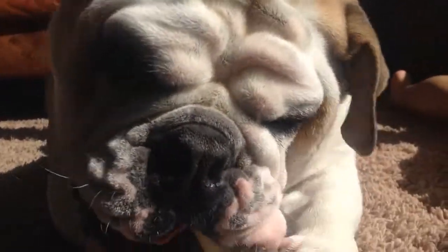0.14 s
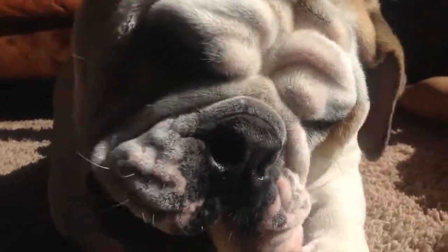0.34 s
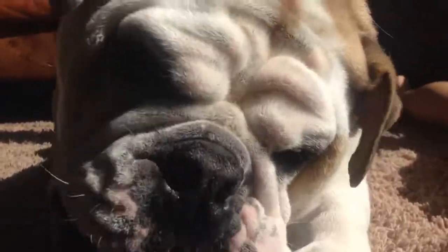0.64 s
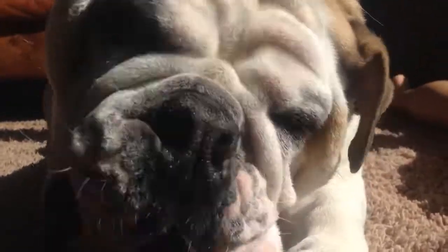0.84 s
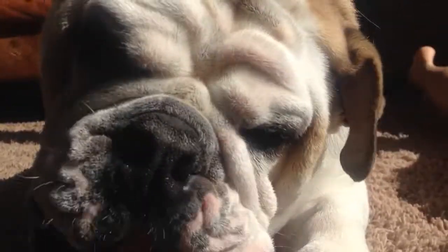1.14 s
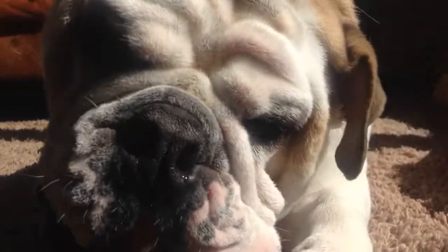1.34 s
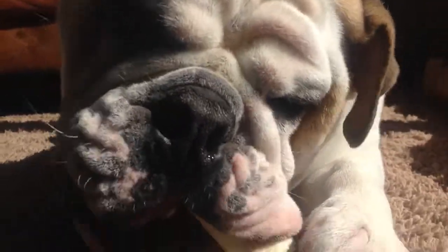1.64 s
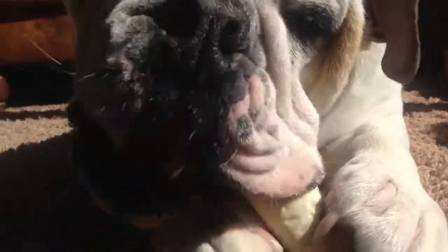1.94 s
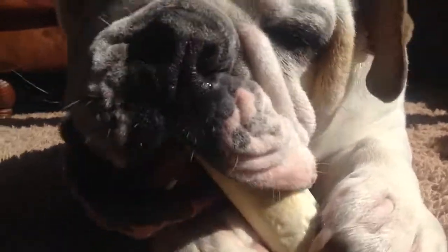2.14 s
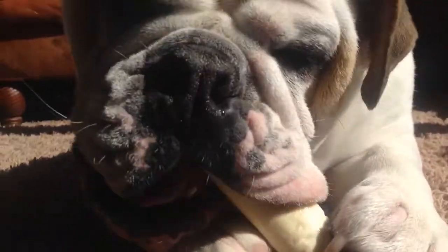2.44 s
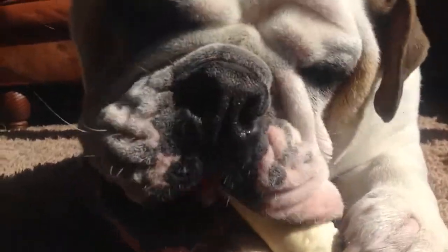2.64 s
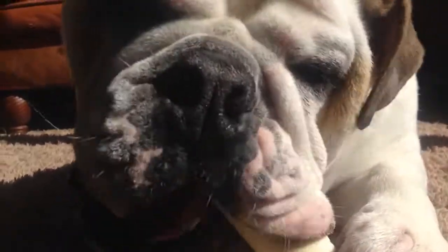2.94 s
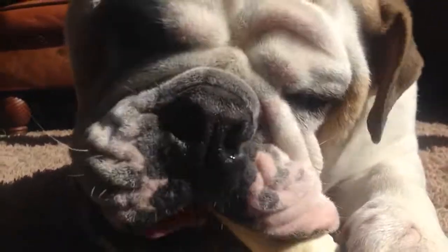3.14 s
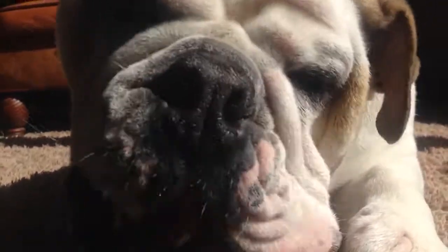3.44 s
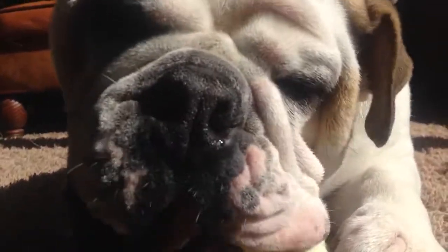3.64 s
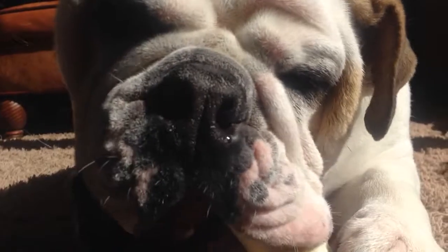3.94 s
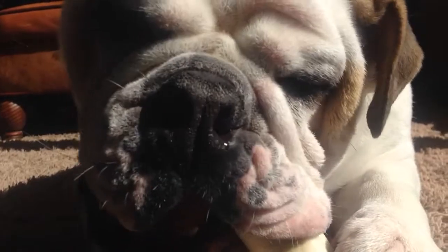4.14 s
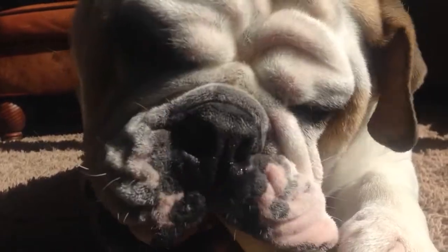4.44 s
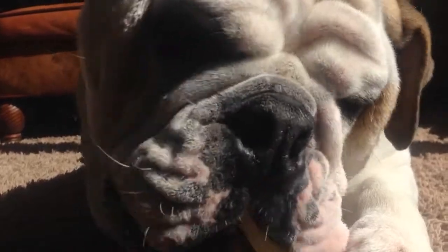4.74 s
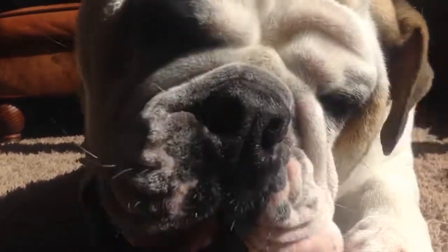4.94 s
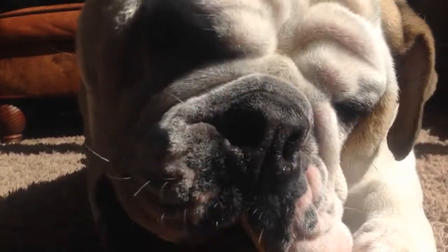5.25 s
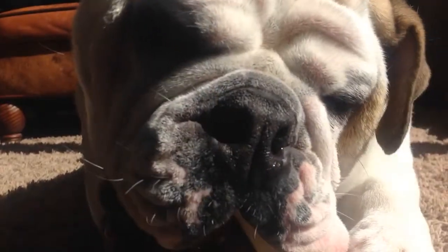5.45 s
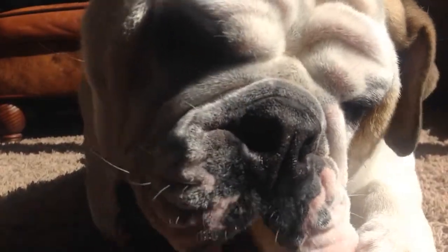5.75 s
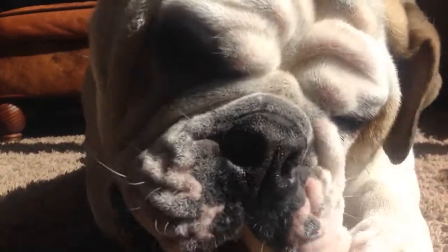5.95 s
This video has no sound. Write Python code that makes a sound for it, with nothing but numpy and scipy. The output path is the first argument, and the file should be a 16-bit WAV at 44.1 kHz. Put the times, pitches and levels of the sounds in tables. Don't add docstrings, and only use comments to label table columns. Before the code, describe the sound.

Very close, a big dog chews a hard bone on carpet. Loud, dry, hollow clacks come irregularly as teeth slip off, with smaller gritty crunches, creaks and splintering ticks around them. Between bites the nose gives short airy hisses with a thin whistle. Soft low bumps and rumble come from the hand-held microphone; the furnished room is quiet and nearly echoless.

```python
import sys
import numpy as np
from scipy import signal
from scipy.fft import rfft, irfft, next_fast_len
from scipy.io import wavfile
from scipy.ndimage import map_coordinates

SR = 44100
rng = np.random.default_rng(int(sys.argv[2]) if len(sys.argv) > 2 else 0)


def gain_from_db(level_db):
    decades = np.asarray(level_db, float) / 20
    return 10 ** decades


def master_out(mix):
    frames = np.transpose(np.atleast_2d(mix))
    ceiling = np.clip(frames, -1, 1)
    pcm = np.round(ceiling * 32767).astype(np.int16)
    wavfile.write(sys.argv[1], SR, pcm)


N = 268569

# (frequency [Hz], density [dB per Hz])
FLOOR_SPECTRUM = [(12, -68), (20, -21), (59, 5), (87, -7), (180, -10.5), (231, -12), (380, -22.5),
                  (488, -25.5), (701, -18.5), (1090, -27.5), (1190, -31.5), (2250, -33), (3140, -21.5),
                  (5320, -26), (15300, -28.5)]
# (frequency [Hz], density [dB per Hz])
RUMBLE_SPECTRUM = [(12, -48), (20, -19.5), (48, -6.5), (70, -2), (140, -15), (179, -13.5), (255, -25),
                   (400, -30), (520, -55), (880, -120)]
# (time [s], level [dB])
HAND_UNREST = [(0, -49.5), (.33, -69), (.5, -58), (.92, -62.5), (1.41, -62), (1.85, -57), (2.22, -57),
               (2.71, -63.5), (3.1, -61), (3.92, -76.5), (4.55, -63.5), (5.12, -66.5), (5.55, -62.5),
               (6.09, -67.5)]
# (time [s], peak [dB], frequency [Hz])
HAND_BUMPS = [(.002, -40, 89), (.034, -37, 65.4), (.059, -25.5, 83), (.372, -50, 91), (.448, -48, 94),
              (.66, -47.5, 86), (.703, -32, 84.6), (1.475, -49.5, 91), (1.598, -40, 94), (1.637, -34, 78),
              (1.67, -32, 99), (1.691, -41, 71), (1.779, -28.5, 96), (1.799, -29.5, 94), (1.842, -40, 118),
              (1.887, -43, 82), (1.915, -35.5, 68), (1.983, -43, 85), (2.066, -45.5, 81), (2.148, -42, 140),
              (2.167, -37, 76.5), (2.209, -42, 71.4), (2.286, -49, 89), (2.336, -47, 81.5),
              (2.763, -50, 87.9), (4.648, -47.5, 104), (4.671, -43.5, 101), (5.628, -42, 100),
              (5.863, -34, 105.6), (1.72, -47, 60), (1.862, -39, 95), (2.035, -47, 90), (2.13, -44, 75),
              (4.6, -49, 110), (5.15, -50, 90), (5.55, -48, 70), (5.645, -48, 100), (5.715, -50, 90),
              (2.585, -48, 100), (3.16, -48, 90)]
# (time [s], peak [dB])
JAW_THUMPS = [(1.193, -38.5), (2, -38), (2.44, -41), (2.494, -48), (2.544, -32.5), (2.61, -38.5),
              (2.898, -39), (2.954, -39), (2.975, -50), (3.098, -37), (4.005, -47.5), (4.395, -37.5),
              (4.965, -47), (.967, -52), (1.558, -50), (3.46, -50), (5.785, -48)]
# (frequency [Hz], t60 [s])
ROOM_DECAY = [(300, .08), (1200, .12), (4000, 0.1)]

# (frequency [Hz], density [dB per Hz])
NOSE_SPECTRUM = [(1500, -40), (2100, -14), (2450, -5), (2900, -4), (3400, -1), (4400, -8), (4850, -7),
                 (5600, -16), (7200, -19), (9500, -41)]
# (frequency [Hz], density [dB per Hz])
RASP_SPECTRUM = [(250, -26.5), (450, 3.5), (700, -9.5), (1100, -2.5), (1600, -4), (2200, -6), (3000, -41)]
# (frequency [Hz], width [Hz])
NOSTRIL_BANDS = [
    (3400, 330),
    (3800, 420),
]
# (start [s], hold [s], hiss [dB], whistle over the hiss [dB], nostril narrowing [0-1])
NOSE_PUFFS = [(.01, 0.09, -73, 2, .02), (0.331, .05, -65.5, -4, 0), (0.557, .28, -59, 1, 0.95),
              (1.94, 0.18, -69.5, -10, .07), (2.24, 0.066, -70.5, -14, .02),
              (2.726, 0.096, -60.5, 3.5, 0.3), (2.907, 0.018, -68, -2, .4), (3.4, .05, -74, -3.5, .1),
              (4.22, 0.093, -72.5, -10, .05), (4.804, 0.083, -59.5, 2, .12), (4.97, .05, -66, -2, .65)]
# (time [s], level [dB])
PANTING = [(0, -70), (.4, -78), (1.2, -74.5), (2.1, -77), (3, -74), (3.7, -77.5), (4.4, -76), (5.4, -77.5),
           (5.8, -78), (6.09, -79.5)]

# (frequency [Hz], level [dB], t60 [s])
BONE_MODES = [(408, 2.5, 0.016), (500, 3.5, 0.037), (720, 0, 0.055), (1020, -1, 0.025), (1250, -3.5, 0.028),
              (1580, -16, 0.0365)]
# (frequency [Hz], density [dB per Hz])
ENAMEL_SPECTRUM = [(1200, -33.5), (2000, -0.5), (2500, -0.5), (3300, -0.5), (4300, -10.5), (5200, -20.5),
                   (7500, -31), (10000, -55)]
# (frequency [Hz], density [dB per Hz])
CREAK_SPECTRUM = [(300, -44.5), (600, -9), (1000, -1.5), (1500, -3.5), (1900, -8), (2600, -44)]
# (time [s], peak [dB], mouth ring [Hz], ring t60 [s], cheek ring [Hz])
SLIPS = [(.5416, -4.5, 1506, 0.015, 1197), (.9615, -12, 1640, 0.014, 1220),
         (1.5044, -22.5, 1584, 0.014, 1000), (1.9626, -7.5, 1508, 0.015, 1244),
         (2.544, -15, 1470, 0.016, 1040), (2.884, -7, 1217, 0.012, 1650), (2.961, -16.5, 1020, 0.018, 1440),
         (3.093, -14, 1547, .023, 680), (3.44, -11.5, 1215, 0.016, 1610), (4.392, -25, 1020, .026, 1620),
         (4.914, -7.5, 1084, 0.022, 1390), (4.959, -25, 1060, 0.028, 1250), (4.937, -43, 1150, .04, 1300),
         (5.3396, -26, 1060, 0.018, 780), (5.783, -27, 1186, 0.022, 990), (5.87, -15.5, 1020, 0.02, 1290)]
# (time [s], peak [dB], mouth ring [Hz], bone re peak [dB], crack re peak [dB])
MOLAR_CRUNCHES = [(.971, -34, 914, -30, -14), (1.187, -32.5, 600, -2.5, -4.5),
                  (1.19, -23.5, 1580, -13, -35), (1.191, -22, 750, -12.5, -9.5), (1.503, -32, 733, -5, -12),
                  (1.553, -34, 1634, -16, -19), (1.647, -41, 600, -14, -40),
                  (1.996, -26.5, 742, -14.5, -17), (2.033, -47.5, 720, -2.5, -4), (2.438, -35, 737, -3, -6),
                  (2.531, -38, 640, -12, -9), (2.548, -31.5, 683, 1, -23), (2.901, -43, 776, -8, -4),
                  (2.955, -31, 1170, -25, -14), (2.965, -31.5, 720, -6, -17), (3.083, -35, 1540, -10, -4),
                  (3.098, -24, 723, -7, -18), (3.103, -31, 1645, -14, -18), (3.997, -43, 1030, -2.5, -8),
                  (4.387, -32.5, 917, -12, -9.5), (4.975, -45.5, 970, -7.5, -22),
                  (5.313, -32.5, 735, -18.5, -40), (5.39, -41, 732, -10, -22),
                  (5.861, -31.5, 1240, -17, -7.5)]
# (time [s], peak [dB], mouth ring [Hz], crack re peak [dB])
LIGHT_TICKS = [(0.052, -39.5, 457, -15), (0.333, -47.5, 415, -7), (.589, -36, 1280, -10),
               (.596, -51, 1550, 5.5), (.666, -40.5, 930, -12), (.907, -42.5, 793, -2.5),
               (2.446, -47, 720, -4), (1.014, -51, 890, -0.5), (1.068, -48.5, 392, -30),
               (1.583, -42, 410, -19), (1.621, -35, 320, -39), (2.442, -34, 1470, -18),
               (2.488, -44.5, 520, -8), (2.606, -47.5, 565, -23), (2.814, -47, 1250, -1),
               (3.281, -49.5, 575, -19), (3.338, -66, 775, 11.5), (3.427, -42, 1180, -7),
               (3.459, -38.5, 1160, -5), (3.72, -61, 350, 0), (3.913, -50.5, 891, -28),
               (4.001, -38, 442, -14), (4.339, -56.5, 1270, 0), (4.379, -40, 460, -18),
               (4.4185, -44, 525, -20), (4.403, -40, 1940, -18), (4.799, -40.5, 568, -27),
               (4.898, -48, 937, 3), (5.362, -46, 1150, -30), (5.878, -53.5, 1200, 7)]
# (time [s], peak [dB], frequency [Hz])
ENAMEL_CHIPS = [(.5418, -17, 2350), (0.5417, -15.5, 3240), (.542, -48, 5700), (.9613, -26, 2420),
                (0.961, -36, 3380), (0.972, -25, 2600), (1.1897, -35, 3680), (1.5033, -33, 3130),
                (1.558, -43, 4340), (1.552, -40.5, 3200), (1.964, -21.5, 2490), (1.962, -37.5, 4200),
                (1.9952, -38, 2490), (2.441, -49, 3150), (2.8835, -42, 3020), (2.8835, -32.5, 4130),
                (2.9622, -29.5, 3100), (3.0987, -33.5, 4340), (3.099, -37, 3480), (3.3378, -43.5, 3590),
                (3.442, -30.5, 3400), (3.4414, -33, 4120), (3.9992, -35.5, 2700), (4.8963, -31, 4140),
                (4.9135, -38, 5160), (4.914, -25.5, 3350), (4.915, -34, 4020), (4.9138, -36, 2200),
                (5.8618, -32, 4240)]
# (time [s], peak [dB], frequency [Hz])
JAW_RINGS = [(.5415, -34, 545), (1.1905, -26, 430), (1.191, -37, 330), (1.553, -38.5, 500),
             (1.963, -27, 744), (1.995, -29.5, 570), (1.9964, -38.5, 1580), (2.438, -35.5, 1130),
             (2.544, -30.5, 440), (2.5435, -27, 610), (2.9595, -28, 413), (2.9599, -26, 1440),
             (3.092, -23, 1060), (3.9989, -42.5, 1580), (4.395, -42, 1430), (4.393, -49, 4300),
             (4.962, -38, 1250), (5.3132, -42, 1080), (5.3895, -38.5, 1124), (4.431, -53, 930),
             (3.76, -52, 900), (3.099, -33, 400), (2.001, -42, 260), (5.595, -52, 1050), (4.384, -44, 1900),
             (3.441, -32.5, 730), (1.799, -50, 565), (5.7823, -33, 730), (5.7835, -34, 480),
             (5.8693, -22.5, 730), (5.8705, -32, 480), (5.874, -33, 1230)]
# (time [s], peak [dB], frequency [Hz])
MIDDLE_RINGS = [(0.5529, -37, 1590), (0.5564, -33, 1290), (0.5639, -50, 690), (0.5639, -42, 1250),
                (0.5734, -44, 1210), (0.5784, -50, 560), (0.5839, -48, 1210), (0.5904, -44, 820),
                (0.5998, -52, 1510), (0.6158, -54, 1420), (0.6233, -50, 1510), (0.6667, -54, 1420),
                (0.9081, -50, 1210), (0.9176, -53, 1160), (0.972, -42, 1680), (0.976, -44, 1890),
                (0.9899, -53, 1250), (0.9904, -51, 1720), (1.0089, -55, 1720), (1.0134, -53, 820),
                (1.204, -50, 1850), (1.2164, -51, 990), (1.5083, -33, 730), (1.5522, -47, 1080),
                (1.6465, -47, 1380), (2.0391, -47, 690), (2.4516, -39, 560), (2.4566, -41, 650),
                (2.4646, -47, 690), (2.5334, -45, 1590), (2.5544, -39, 1550), (2.5589, -41, 1380),
                (2.5763, -50, 650), (2.8133, -55, 1590), (2.8956, -36, 780), (2.9046, -41, 1340),
                (2.9101, -42, 730), (2.9106, -45, 1510), (2.9779, -44, 1030), (3.0942, -21, 650),
                (3.0992, -27, 1080), (3.1006, -26, 1590), (3.1151, -46, 1030), (3.1201, -46, 1550),
                (3.1256, -49, 1640), (3.1336, -53, 470), (3.4618, -41, 1210), (3.4833, -53, 1250),
                (3.9991, -42, 430), (4.4097, -49, 900), (4.4311, -52, 560), (4.8118, -45, 520),
                (4.9031, -50, 1290), (4.9754, -40, 1030), (5.3545, -52, 990), (5.361, -50, 520),
                (5.7741, -53, 950), (5.8614, -46, 1810), (5.8753, -50, 1810), (5.8973, -53, 690)]
# (time [s], peak [dB], frequency [Hz])
MORE_RINGS = [(0.5612, -50, 2110), (0.5612, -44, 1640), (0.5737, -49, 1590), (0.5832, -49, 1210),
              (0.5902, -45, 820), (0.9763, -45, 1890), (0.9833, -47, 1940), (1.1863, -40, 2840),
              (1.552, -47, 1030), (1.6458, -48, 990), (1.6463, -48, 1420), (1.6473, -40, 560),
              (1.9825, -48, 820), (2.4395, -35, 1030), (2.4509, -40, 560), (2.5327, -46, 1550),
              (2.5362, -39, 690), (2.5422, -46, 2370), (2.5687, -49, 1550), (2.9029, -49, 1890),
              (2.9049, -41, 650), (2.9089, -45, 1550), (2.9573, -46, 2540), (2.9608, -42, 2020),
              (3.083, -47, 2540), (3.085, -37, 730), (3.087, -42, 2020), (3.092, -45, 2840),
              (3.092, -44, 2410), (3.0985, -43, 2500), (3.099, -28, 1080), (3.1149, -43, 430),
              (3.4586, -47, 1460), (4.8121, -46, 520), (4.9597, -49, 470), (5.3618, -48, 1030),
              (5.3902, -47, 260)]
# (time [s], peak [dB], frequency [Hz])
HIGH_RINGS = [(0.071, -50.0, 3360.0), (0.53, -51.0, 2670.0), (0.5484, -44.0, 2670.0),
              (0.5943, -43.0, 3570.0), (0.9705, -51.0, 3880.0), (1.186, -50.0, 4740.0),
              (1.187, -37.0, 2840.0), (1.1895, -34.0, 2280.0), (1.192, -41.0, 3230.0),
              (1.5477, -53.0, 2070.0), (1.9627, -39.0, 3140.0), (1.9762, -51.0, 2540.0),
              (2.4397, -50.0, 2240.0), (2.4406, -48.0, 3100.0), (2.4456, -51.0, 2970.0),
              (2.5329, -51.0, 3320.0), (2.5434, -46.0, 3530.0), (2.5474, -49.0, 2450.0),
              (2.7859, -43.0, 3400.0), (2.8936, -52.0, 2760.0), (2.8991, -45.0, 4010.0),
              (2.9545, -35.0, 3100.0), (2.9585, -43.0, 2630.0), (2.9709, -51.0, 3060.0),
              (3.0822, -45.0, 2450.0), (3.0867, -39.0, 2070.0), (3.0872, -38.0, 2970.0),
              (3.3396, -50.0, 3140.0), (3.9986, -50.0, 3360.0), (4.3857, -49.0, 3490.0),
              (4.8991, -45.0, 3230.0), (4.927, -48.0, 3400.0), (5.8599, -43.0, 2500.0),
              (5.8743, -49.0, 2580.0), (5.8758, -48.0, 4220.0)]
# (time [s], peak [dB], frequency [Hz])
TIP_PRICKS = [(.5952, -46, 3700), (.9083, -42, 1800), (.9412, -50, 3800), (.9617, -34, 3400),
              (.9716, -40, 3200), (1.5042, -36, 2800), (1.5585, -46, 4200), (1.9962, -37, 1900),
              (2.5443, -38, 3000), (2.8843, -34, 3200), (2.9005, -44, 4200), (3.3405, -45, 3800),
              (3.4415, -38, 3600), (3.9992, -42, 2200), (4.3805, -46, 1800), (4.4315, -50, 1600),
              (4.9145, -37, 2900)]

FLOOR_DB, ROOM_DB, TOP_HZ = -62.5, -21, 15340
THUMP_HZ = 148
KNUCKLE_DB, KNUCKLE_RATIO = -20, 2.8
RISE_DB_PER_S, FALL_DB_PER_S, SAG_DB_PER_S = 220, 152.5, 10.5
RELAX_PER_S = 1.5
REST_HISS_DB, REST_WHISTLE_DB, PUFF_RASP_DB = 1.14, -5.5, -14
RING_T60_S, RING_SLOPE, LONGEST_S = .034, 0.57, .06
PRESS_S, PRESS_SLOPE = .0011, 0.6
SLIP_BONE_DB, SLIP_CRACK_DB = -34, -28.5
CHEEK_DB, CHEEK_T60_S, TIGHT_T60_S = -5, 0.014, 0.0049
EDGE_DB, EDGE_HZ, EDGE_T60_S = -20, 2700, 0.0044
TICK_BONE_DB, TICK_DAMPING = -17.5, 0.94
CREEP_DB, CREEP_T60_S = -27, .035
CHIP_T60_S, JAW_T60_S, MIDDLE_T60_S, HIGH_T60_S = 0.011, 0.027, .017, .011
PRICK_T60_S, PRICK_RISE_S = .0028, .00026


def unit(x):
    return x / np.sqrt(np.mean(x ** 2) + 1e-20)


def along(points, hz):
    f, v = np.transpose(points)
    return np.interp(np.log(hz + 1), np.log(f + 1), v)


def level_curve(rows):
    s, db = np.transpose(rows)
    return np.interp(np.arange(N) / SR, s, db)


def wobble(rate):
    knots = rng.standard_normal(int(N * rate / SR) + 4)
    return map_coordinates(knots, [np.arange(N) * rate / SR])


def filtered(x, response):
    m = next_fast_len(N + 8192)
    return irfft(rfft(x, m) * response(np.fft.rfftfreq(m, 1 / SR)), m)[..., :N]


def coloured(x, spectrum):
    return filtered(x, lambda hz: gain_from_db(along(spectrum, hz)))


def fluttering(lumpy_db, rate):
    return rng.standard_normal(N) * gain_from_db(lumpy_db * wobble(rate))


def noise(spectrum, lumpy_db, rate):
    return unit(coloured(fluttering(lumpy_db, rate), spectrum))


def grit(envelope, spectrum, lumpy_db, rate):
    source = fluttering(lumpy_db, rate)
    return coloured(envelope * source, spectrum) / np.std(coloured(source, spectrum))


def ring(modes, t, attack):
    hz, db, t60 = np.transpose(modes)[:, :, None]
    decaying = gain_from_db(db - 60 * t / t60) * np.sin(2 * np.pi * hz * t)
    return decaying.sum(axis=0) * (1 - np.exp(-(t / attack) ** 2))


def place(out, s, sound):
    out[round(s * SR):][:len(sound)] += sound


def quiet_floor():
    return gain_from_db(FLOOR_DB) * noise(FLOOR_SPECTRUM, lumpy_db=0, rate=5)


def handling():
    out = np.zeros(N + SR)
    t = np.arange(-SR // 20, SR // 20) / SR
    knocks = HAND_BUMPS + [(s, db, THUMP_HZ) for s, db in JAW_THUMPS]
    phases = rng.uniform(0, 2 * np.pi, len(knocks))
    for (s, db, hz), phase in zip(knocks, phases):
        for f, gain in [(hz, 1), (KNUCKLE_RATIO * hz, gain_from_db(KNUCKLE_DB))]:
            pulse = np.exp(-(t * f / 0.51) ** 2) * np.cos(2 * np.pi * f * t + phase)
            place(out, s, gain_from_db(db) * gain * pulse)
    rumble = gain_from_db(level_curve(HAND_UNREST)) * noise(RUMBLE_SPECTRUM, lumpy_db=3.5, rate=36)
    return out[SR // 20:][:N] + rumble


def room(x):
    out, hop = np.zeros(N + SR), SR // 4
    for start in range(0, N, hop):
        hz, t, z = signal.stft(rng.standard_normal(SR // 4), SR, nperseg=256)
        decay = gain_from_db(-60 * t / along(ROOM_DECAY, hz + 1)[:, None])
        tail = signal.istft(z * decay, SR, nperseg=256)[1]
        wet = signal.fftconvolve(x[start:start + hop], tail / np.linalg.norm(tail))
        out[start + 130:][:len(wet)] += wet
    return out[:N]


def nostril_whistle(centre, width):
    offsets = [(-3, -40), (-1, -9), (0, 0), (1, -9), (3, -40)]  # (widths, dB)
    return noise([(centre + k * width, db) for k, db in offsets], lumpy_db=3.0, rate=81)


def breath():
    start, hold, db, whistle_db, narrowing = np.transpose(NOSE_PUFFS)[:, :, None]
    since = np.arange(N) / SR - start
    rise = RISE_DB_PER_S * since
    fall = -SAG_DB_PER_S * since - FALL_DB_PER_S * np.maximum(since - hold, 0)
    puffs = gain_from_db(db + np.minimum(rise, fall))
    all_puffs = puffs.sum(axis=0)
    rest = gain_from_db(level_curve(PANTING))
    rest_hiss = gain_from_db(REST_HISS_DB) * rest

    wide, narrow = [nostril_whistle(centre, width) for centre, width in NOSTRIL_BANDS]
    turn = np.clip(narrowing - RELAX_PER_S * since, 0, 1) * np.pi / 2
    whistle = puffs * gain_from_db(whistle_db)
    nose = (rest_hiss + all_puffs) * noise(NOSE_SPECTRUM, lumpy_db=2.0, rate=440)
    nose += (rest_hiss * gain_from_db(REST_WHISTLE_DB) + (whistle * np.cos(turn)).sum(axis=0)) * wide
    nose += (whistle * np.sin(turn)).sum(axis=0) * narrow
    rasp = (rest + gain_from_db(PUFF_RASP_DB) * all_puffs) * noise(RASP_SPECTRUM, lumpy_db=2.5, rate=80)
    return gain_from_db(-2.0) * nose + rasp


def press(hz):
    return PRESS_S * (1000 / min(hz, 1600)) ** PRESS_SLOPE


def mouth_t60(hz):
    return min(RING_T60_S * (1000 / hz) ** RING_SLOPE, LONGEST_S)


def contacts():
    rows = [(s, db, hz, t60, SLIP_BONE_DB, SLIP_CRACK_DB) for s, db, hz, t60, _ in SLIPS]
    for s, db, hz, bone_db, crack_db in MOLAR_CRUNCHES:
        rows.append((s, db, hz, mouth_t60(hz), bone_db, crack_db))
    for s, db, hz, crack_db in LIGHT_TICKS:
        t60 = TICK_DAMPING * min(mouth_t60(hz), RING_T60_S)
        rows.append((s, db, hz, t60, TICK_BONE_DB, crack_db))
    return rows


def neighbours():
    rows = []
    for s, db, mouth_hz, _, cheek_hz in SLIPS:
        t60 = CHEEK_T60_S if cheek_hz < mouth_hz else TIGHT_T60_S
        rows.append((s, db + CHEEK_DB, cheek_hz, t60))
        rows.append((s, db + EDGE_DB, EDGE_HZ, EDGE_T60_S))
    for table, t60 in [(ENAMEL_CHIPS, CHIP_T60_S), (JAW_RINGS, JAW_T60_S), (MIDDLE_RINGS, MIDDLE_T60_S),
                       (MORE_RINGS, MIDDLE_T60_S), (HIGH_RINGS, HIGH_T60_S)]:
        rows += [(*row, t60) for row in table]
    return rows


def swell(lead, rise_t60, fall_t60):
    return gain_from_db(np.where(lead < 0, 60 * lead / rise_t60, -60 * lead / fall_t60))


def teeth():
    out, scrape, strain = np.zeros((3, N + SR))
    t = np.arange(SR // 8) / SR
    lead = np.arange(-SR // 20, SR // 5) / SR
    slide = swell(lead, 0.016, .03)
    load = swell(lead, .035, .13)
    creep = swell(lead, CREEP_T60_S, .01)
    for s, db, hz, t60, bone_db, crack_db in contacts():
        level_chance, pitch_chance = rng.standard_normal((2, len(BONE_MODES)))
        modes = np.array(BONE_MODES, float)
        modes[:, 0] *= 1 + .03 * pitch_chance
        modes[:, 1] += 3 * level_chance
        bone = gain_from_db(bone_db + 3.0) * ring(modes, t, .0013)
        mouth = ring([(hz, 0, t60)], t, press(hz))
        place(out, s, gain_from_db(db - 2.5) * (mouth + bone))
        place(scrape, s, gain_from_db(db + crack_db - 9) * slide)
        place(strain, s, gain_from_db(db - 38) * load + gain_from_db(db + CREEP_DB + .5 * crack_db) * creep)
    for s, db, hz, t60 in neighbours():
        place(out, s, -ring([(hz, db, t60)], t, press(hz)))
    for s, db, hz in TIP_PRICKS:
        place(out, s, ring([(hz, db + 5, PRICK_T60_S)], t, PRICK_RISE_S))
    enamel = grit(scrape[SR // 20 - 60:][:N], ENAMEL_SPECTRUM, lumpy_db=6.0, rate=550)
    creak = grit(strain[SR // 20:][:N], CREAK_SPECTRUM, lumpy_db=4.0, rate=160)
    return out[:N] + enamel + creak


def scene():
    bites = teeth()
    return (quiet_floor() + handling() + breath() + gain_from_db(ROOM_DB) * room(bites) + bites)[None]


def low_pass(x):
    return signal.sosfilt(signal.butter(12, 15670, fs=SR, output="sos"), x)


def record(dry):
    mix = filtered(dry, lambda hz: (hz < TOP_HZ) * hz ** 2 / (hz ** 2 + 28 ** 2))
    return low_pass(mix)


dry = scene()
out = record(dry)
master_out(out)
```